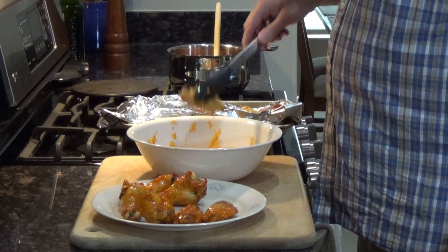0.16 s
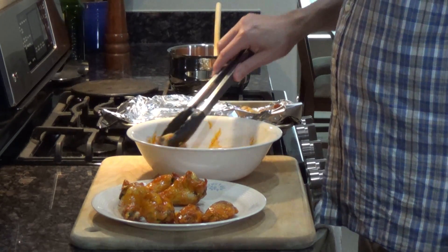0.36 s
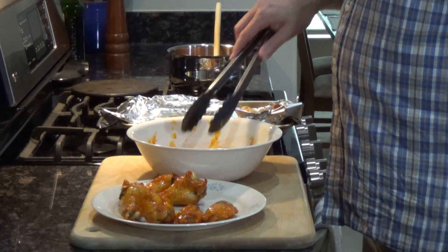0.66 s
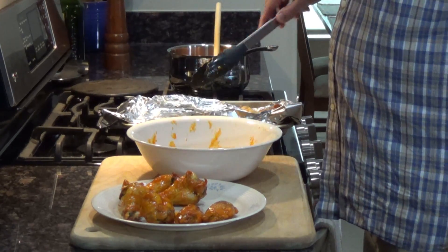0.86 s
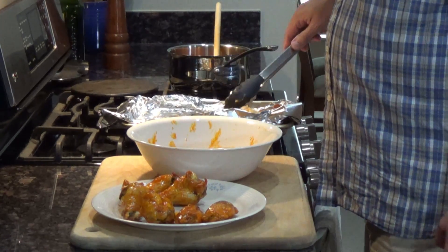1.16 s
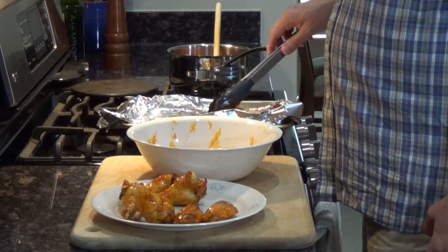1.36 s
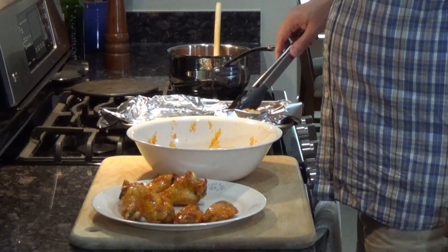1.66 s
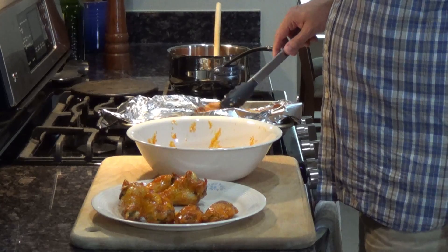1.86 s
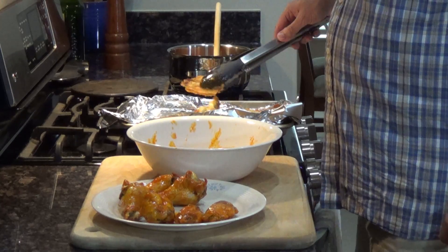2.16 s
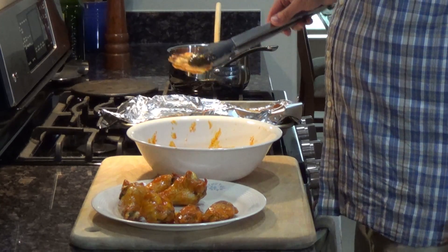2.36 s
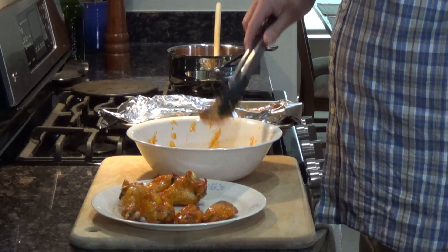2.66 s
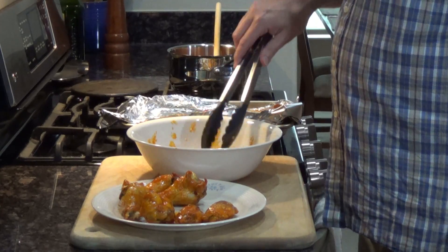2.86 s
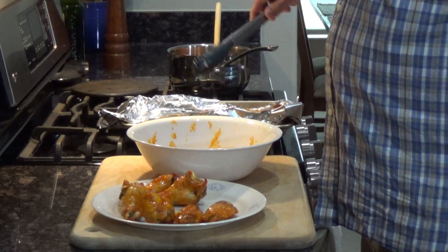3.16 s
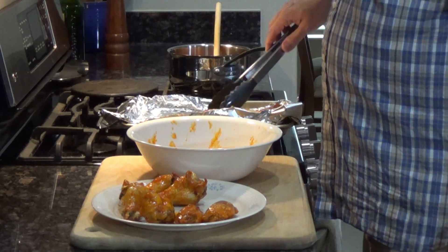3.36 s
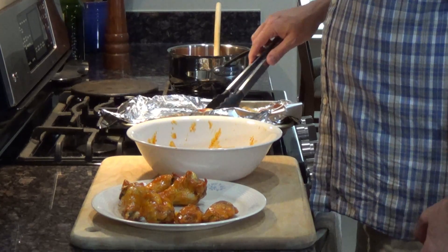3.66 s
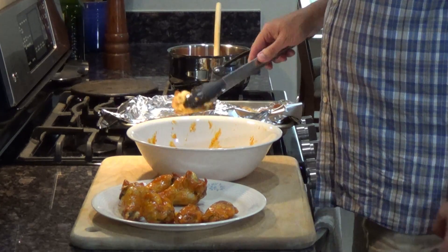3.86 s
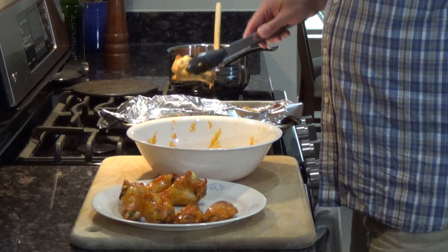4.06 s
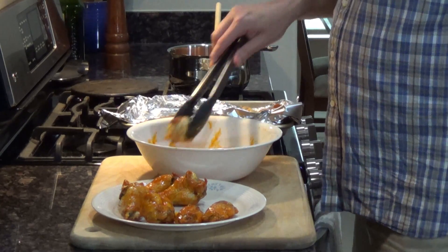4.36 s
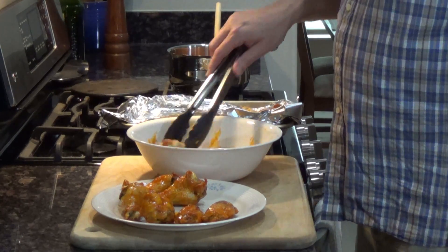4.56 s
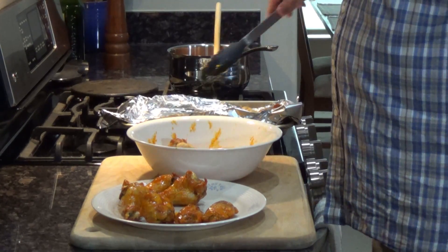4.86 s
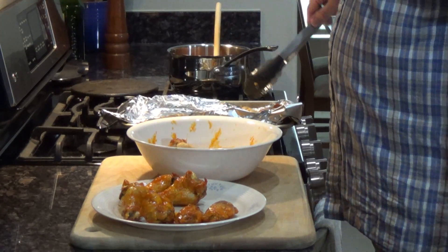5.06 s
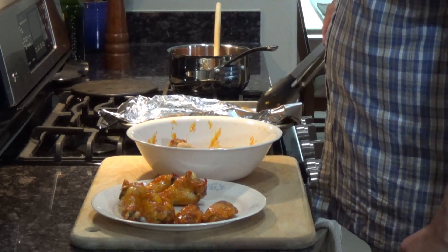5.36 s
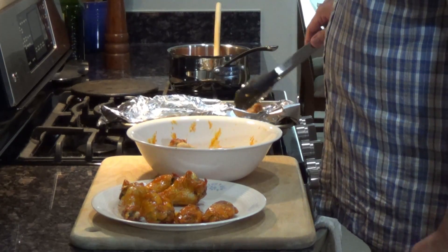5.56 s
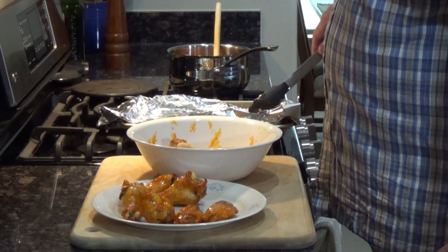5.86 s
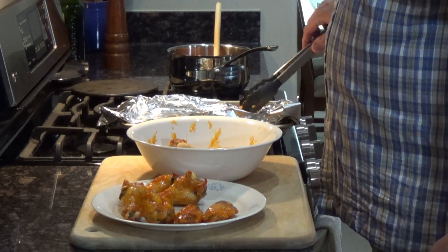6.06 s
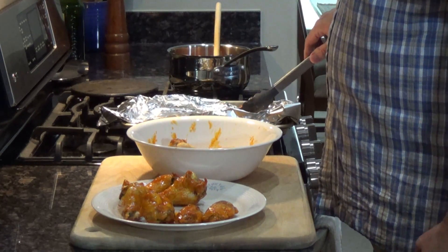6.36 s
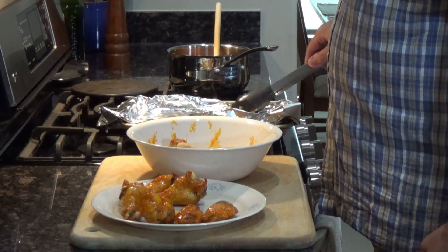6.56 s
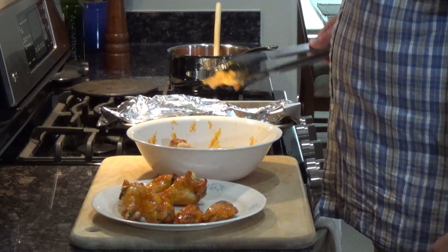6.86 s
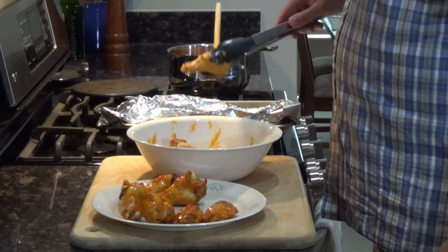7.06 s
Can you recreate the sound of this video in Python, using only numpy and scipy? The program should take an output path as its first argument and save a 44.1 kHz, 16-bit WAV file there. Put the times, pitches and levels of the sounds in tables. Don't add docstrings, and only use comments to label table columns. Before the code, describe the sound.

A small hard kitchen with short bright echoes, heard through a nearby stereo microphone with faint hiss, mains hum, rapid soft ticking and thin high whine. At about 0.55-0.7 seconds, steel tongs click in small dry chatters. From 1.2 to 2.2 they drag unevenly over a foil-lined tray, rustling with crisp snaps and dull pops. At 2.3 a hard press makes the loudest crack, with a low tray boom. Around 2.9 the tongs clatter and knock against a ceramic bowl. A light scrape begins at 3.4, with a boomy pop at 3.7 and brief rustle after. At 4.53 the bowl is struck clearly, ringing bright until soft taps and landing food muffle it by 4.8. From 5.4 foil crackles and drags again, peaking in a shove and sharp tray pops at 6.05-6.2, then a fading scrape with small snaps until 6.8, leaving quiet room hiss.

```python
import sys
import numpy as np
from scipy import signal
from scipy.fft import rfft, irfft
from scipy.io import wavfile
from scipy.ndimage import uniform_filter1d

SR = 44100
rng = np.random.default_rng(int(sys.argv[2]) if len(sys.argv) > 2 else 0)


def master_out(mix):
    frames = np.transpose(np.atleast_2d(mix))
    ceiling = np.clip(frames, -1, 1)
    pcm = np.round(ceiling * 32767).astype(np.int16)
    wavfile.write(sys.argv[1], SR, pcm)


def linear_from_db(decibels):
    return 10 ** (np.asarray(decibels, float) / 20)


N = 317513
T = np.arange(N) / SR

# pitch_hz, density_db (per Hz)
FOIL_COLOUR = [(1530, -27.5), (2600, -3.5), (2880, -3.5), (3120, 1), (4010, 0), (4390, 0.5), (7140, -9.5),
               (7500, -11), (9750, -23.5), (16500, -120)]
# pitch_hz, density_db (per Hz)
SIZZLE_COLOUR = [(3820, -49.5), (6500, -5.5), (7140, -7.5), (9190, 0), (10500, 0.5), (12900, -7),
                 (15300, -17), (16000, -15)]
# pitch_hz, density_db (per Hz)
FLEX_COLOUR = [(530, -32.5), (900, -1.5), (1450, -6.5), (1580, -3.5), (1730, -6), (2040, -1), (2800, -10.5),
               (3640, -28), (6160, -120)]


def set_rms(x, db):
    return x * linear_from_db(db) / np.sqrt(np.mean(x ** 2))


def colour(x, points):
    hz, db = np.transpose(points)
    f = np.maximum(np.fft.rfftfreq(4096, 1 / SR), 1)
    cepstrum = irfft(np.interp(np.log(f), np.log(hz), db) * np.log(10) / 20)
    cepstrum[1:2048] *= 2
    cepstrum[2049:] = 0
    response = irfft(np.exp(rfft(cepstrum)))
    return signal.fftconvolve(x, response / np.linalg.norm(response))[:N]


def ring(x, modes, damp=1.0, tilt_db=0., longest_s=1.0):
    out = np.zeros(len(x))
    for k, (hz, db, t60) in enumerate(modes):
        decay = np.log(1000) / (damp * min(t60, longest_s) * SR)
        pole = np.exp(2j * np.pi * hz / SR - decay)
        gain = (-1) ** k * linear_from_db(db + tilt_db * np.log2(hz / 9000))
        out += gain * signal.lfilter([1], [1, -pole], x).imag
    return out / sum(linear_from_db(m[1]) ** 2 for m in modes) ** .5


def walk(rate):
    hold = int(SR / rate)
    steps = np.repeat(rng.standard_normal(N // hold + 1), hold)
    return 1.67 * uniform_filter1d(uniform_filter1d(steps, hold), hold)[:N]


def bursts(events, rise_ms):
    env = np.zeros((4, N))
    t_ms = T[:SR // 4] * 1000
    for s, db, *re_db, ms in events:
        shape = (1 - np.exp(-(t_ms + 0.052) / rise_ms)) * np.exp(-t_ms / max(ms, .1))
        start = int(s * SR)
        env[:, start:start + len(t_ms)] += linear_from_db(db + np.array([0] + re_db))[:, None] * shape
    return env


def crackle(rate, spread_db):
    fires = rng.random(N) < rate / SR
    sizes = linear_from_db(spread_db * np.minimum(rng.exponential(size=N), 5))
    return set_rms(fires * rng.choice([-1, 1], N) * sizes, 0)


def camcorder():
    # pitch_hz, density_db (per Hz)
    air_mid = [(12, -86), (20, -51.5), (48, -14), (91, -16.5), (172, -6), (210, -11), (301, -6.5),
               (328, -10.5), (357, -1.5), (388, -7.5), (698, -8.5), (2200, -18), (3160, -18.5),
               (12400, -23.5), (16000, -24)]
    air_side = [(12, -95), (20, -61), (127, -16), (270, -9), (301, -4), (337, -1), (1090, -1.5), (1260, -2),
                (3250, -6.5), (8410, -19), (16000, -64)]
    # pitch_hz, level_db (rms)
    hum = [(60, -81.5), (120, -78.5), (179, -76.5), (241, -72.5), (301, -68), (361, -71), (420, -74),
           (481, -70), (700, -74.5)]
    frame_hz, first_tick_s, whine_hz = 30 / 1.001, .0295, 15734.
    mid = set_rms(colour(rng.standard_normal(N), air_mid), -57.5) * linear_from_db(.5 * walk(3.04))
    side = set_rms(colour(rng.standard_normal(N), air_side), -63.5)
    for hz, db in hum + [(whine_hz, -70)]:
        wavering = 2 ** .5 * linear_from_db(db + 1.44 * walk(8.9))
        mid += wavering * np.sin(2 * np.pi * hz * T + 0.41 * walk(2.7))
    at = np.arange(first_tick_s, T[-1], 1 / frame_hz)
    ticks = np.zeros(N)
    ticks[(at * SR).astype(int)] = linear_from_db(1.5 * (-1) ** np.arange(len(at)) + 1.2 * rng.standard_normal(len(at)))
    mid += linear_from_db(-56.5) * ring(ticks, [(3210, 5.5, 0.032), (3640, -6.5, 0.028)])
    return mid * linear_from_db(np.array([[-.15], [.15]])) + side * np.array([[1], [-1]])


def bowl():
    # start_s, peak_db, hardness_db (per octave), ring left by the grip (0-1)
    strikes = [
        (2.9105, -46, -2.5, 0.23),
        (4.5322, -23.5, 2, 0.58),
        (4.692, -44.5, 13, 0.2),
        (4.7661, -49, 1, 0.46),
    ]
    # pitch_hz, level_db, t60_s
    partials = [(720, 0, 1.86), (1335, -21, 2.4), (2132, -15.5, 1.3), (3043, -1.5, 0.2),
                (4032, -16.5, 0.26), (5120, -5.5, 0.1), (5830, -25.5, .25), (6100, -16, 0.32),
                (6280, -5.5, 0.28), (6720, -2.5, 0.19), (7160, -5, .2), (7440, -8, 0.2), (7870, -2.5, 0.27),
                (8200, -5, 0.07), (8800, 0, 0.19), (8950, -2, 0.16), (9000, -22, .17), (9600, 0, 0.2),
                (10200, -8.5, 0.28), (10600, -22, .18), (10600, 3, 0.049), (11470, -25.5, 0.098),
                (11630, -30, .22), (12700, -11, .12), (12900, -32, .2)]
    food_lands_s, muffled_t60_s = 4.77, .12
    low_hz, _, low_t60 = partials[0]
    low, high = np.zeros((2, N))
    blow = signal.unit_impulse(SR // 2)
    twins = [(hz * (1 + 0.002 * (hz > 4500)), db + 2.5, 0.55 * t60) for hz, db, t60 in partials[1:]]
    t = T[:SR]
    for s, db, hard_db, grip in strikes:
        i = int(s * SR)
        low[i:i + SR] += linear_from_db(db - 21 - 4.6 * hard_db - 60 * t / low_t60) * np.sin(2 * np.pi * low_hz * t)
        bright = ring(blow, partials[1:] + twins, damp=grip ** 2 * 4, tilt_db=hard_db)
        high[i:i + SR // 2] += linear_from_db(db) * bright
    return low + high * linear_from_db(-60 * np.clip(T - food_lands_s, 0, 1) / muffled_t60_s)


def tongs():
    # start_s, peak_db, top_db (re peak), chatter_ms, pitch_hz
    clicks = [(0.5443, -34, -12, 3.3, 4430), (0.5827, -34.5, -9, 4.8, 3740), (.598, -46, -1, 12, 2500),
              (.6755, -31.5, -0.5, 5, 3100), (.681, -28.5, -9, 7.7, 6300), (0.693, -31.5, -7, 6, 7800),
              (.707, -48, -1, 6, 6000), (2.858, -45, -5, 8, 4100), (2.866, -36, -10, 4.4, 2800),
              (2.8881, -26.5, -7, 5.2, 4510), (2.894, -27, -6, 3.2, 5000), (2.906, -40, 9, 1.4, 4830),
              (2.9112, -27, -6.5, 5, 5630), (2.927, -39, -11, 15, 5500), (4.5306, -24, 5, 8, 5240),
              (4.6925, -48.5, 17, 9.9, 6000), (4.7665, -47.5, 5.5, 18, 3117)]
    # start_s, peak_db, pitch_hz, t60_s
    knocks = [(.676, -50, 1760, .04), (2.858, -49, 1270, 0.061), (2.888, -25, 1230, 0.019),
              (2.888, -27.5, 1740, 0.012), (2.888, -41.5, 8200, .025), (2.911, -33, 504, 0.056),
              (2.911, -27.5, 905, 0.019), (2.911, -27.5, 1300, 0.021), (2.925, -52, 6100, .2),
              (2.911, -46, 8200, .025), (2.918, -36, 1760, 0.022), (2.918, -36, 602, 0.095),
              (2.92, -49, 258, 0.24), (2.93, -55, 111, 0.14), (4.532, -45.5, 267, 0.36),
              (4.532, -29.5, 513, 0.026), (4.797, -42.5, 276, 0.052)]
    out, t = np.zeros(N), T[:SR // 4]
    contact = 1 - np.exp(-(t + .0001) / 0.00075)
    for s, db, top_db, ms, hz in clicks:
        chatter = rng.standard_normal(len(t)) * np.exp(-1000 * t / max(ms, .1)) * contact
        chatter[SR // 3000] = 4.5
        body = colour(chatter, FLEX_COLOUR[:-3] + FOIL_COLOUR[2:])[:len(t)]
        crack = 0.33 * ring(chatter, [(hz, 0, .0025)]) + linear_from_db(-8) * body
        top = linear_from_db(top_db) * colour(chatter, SIZZLE_COLOUR)[:len(t)]
        out[int(s * SR):][:len(t)] += linear_from_db(db - 8.5) * (crack + top)
    for s, db, hz, t60 in knocks:
        swing = 1 - np.exp(-t * hz * 2)
        out[int(s * SR):][:len(t)] += linear_from_db(db - 60 * t / t60) * swing * np.sin(2 * np.pi * hz * t)
    return out


def foil():
    # time_s, effort_db, tray_weight_db
    drags = [
        [(1.22, -79, 3), (1.292, -44.5, -9.5), (1.4, -45, 0), (1.48, -52, -4), (1.68, -44, -3), (1.73, -49, 3),
         (1.806, -38.5, -9.5), (1.92, -48, -9)],
        [(1.92, -41.5, -12.5), (2.07, -53, -6), (2.08, -38, -16), (2.2, -54, 1)],
        [(3.4, -87, 3), (3.456, -50.5, -20), (3.484, -51, -2), (3.604, -64, 3), (3.682, -43, -17)],
        [(3.69, -25.5, -6.5), (3.738, -50.5, 7), (3.818, -40, -17), (3.95, -80, 19)],
        [(5.36, -87, -3), (5.392, -46.5, -1.5), (5.62, -33, -9), (5.682, -42, 0), (5.812, -51.5, -4),
         (5.87, -46.5, -2.5), (5.995, -63, 8)],
        [(5.985, -56, 5), (6.03, -49.5, -8), (6.06, -28.5, -18), (6.156, -45.5, 4), (6.164, -30, -6),
         (6.19, -39.5, 5.5), (6.36, -62.5, 7.5)],
        [(6.35, -63, 6), (6.525, -58.5, 0.5), (6.538, -52.5, -1), (6.59, -49, -0.5), (6.8, -74.5, 11)],
    ]
    # start_s, peak_db, crispness_db
    creases_snapping = [(1.2655, -44, -7), (1.3287, -37, -6), (1.383, -38, 4), (1.45, -28.5, -17.5),
                        (1.617, -22.5, -4), (1.665, -31.5, 4.5), (1.5074, -45, 5), (1.8275, -35, -18),
                        (1.9318, -22.5, -3), (1.963, -29.5, -1.5), (1.9774, -30, -3), (2.035, -23.5, 0),
                        (2.079, -20, -2), (3.4434, -40, -12.5), (3.526, -41, -3), (5.389, -26.5, -4),
                        (5.446, -41, -19), (5.559, -28, 1), (5.6056, -25.5, 4.5), (5.6436, -23, -12),
                        (5.675, -36.5, -24.5), (5.751, -33, 0.5), (5.812, -35, -3), (5.869, -33.5, -25),
                        (6.045, -36, 5.5), (6.095, -23, 5.5), (6.536, -41, -14), (6.573, -33.5, -6),
                        (6.6244, -42, -14), (6.703, -51, -17)]
    # start_s, peak_db, sizzle_db, boom_db (both re peak), burst_ms
    jolts = [
        (1.5564, -27.5, -7, -11.5, 10.5),
        (1.715, -40, -6, 8, 13),
        (1.792, -29.5, -10, -2.5, 12),
        (2.3131, -9, 5, 8, 11.8),
        (2.3203, -4, -3.5, -21, 7.3),
        (3.6594, -35.5, -8, -8, 20),
        (3.695, -19.5, -21, -2, 11.7),
        (3.7424, -36.5, 7, -10, 16),
        (6.1623, -16, -24, -9.5, 12),
        (6.189, -24.5, 7, 2, 10.6),
    ]
    # rest_db, slope (dB per dB of weight)
    drag_mix = [(-5.5, -0.21), (3.5, 1.17), (-2.5, 0.3)]
    # rest_db, slope (dB per dB of crispness)
    snap_mix = [(1.1, 1.1), (-19, -0.8), (-14.5, -1)]
    # pitch_hz, level_db, t60_s
    tray_modes = [(239.7, -22.5, 0.37), (484, -19, .45), (575.2, 1.5, 0.29), (690, -2.5, 0.25),
                  (788, -17, 0.31), (961.4, -13.5, 0.41), (1162, -16, 0.25), (1303, -20, .2)]
    # pitch_hz, density_db (per Hz)
    boom_colour = [(120, -38), (200, -17.5), (237, -21.5), (271, -22), (352, -15), (438, -11.5), (588, 5),
                   (733, -1.5), (951, -0.5), (1500, -13), (1950, -34.5), (3300, -120)]

    snaps = []
    for s, db, crisp in creases_snapping:
        layers = [rest + slope * crisp for rest, slope in snap_mix]
        snaps.append((s, db, *layers, 10.8 - 0.47 * (db + 30.5)))
    pop_bursts = [(s, db, top, low, -1 + .3 * low, ms) for s, db, top, low, ms in jolts]
    env = linear_from_db(-10.0) * bursts(snaps, rise_ms=2.85) + linear_from_db(-11.5) * bursts(pop_bursts, rise_ms=1.56)

    uneven = 1.56 * walk(60) + 2.13 * np.array([walk(35) for layer in range(4)])
    for drag in drags:
        s, db, weight = np.transpose(drag)
        on = slice(int(s[0] * SR), int(s[-1] * SR))
        fade = np.clip(np.minimum(T[on] - s[0], s[-1] - T[on]) / 0.0097, 0, 1)
        layers = [db] + [db + rest + slope * weight for rest, slope in drag_mix]
        curves = np.array([np.interp(T[on], s, c) for c in layers])
        env[:, on] += fade * linear_from_db(-5.0 + curves + uneven[:, on])

    creases, pops = crackle(6000, spread_db=2.5), np.zeros(N)
    for s, db, top, low, ms in jolts:
        creases[int((s + .0015) * SR)] = linear_from_db(14.5)
        pops[int(s * SR)] = linear_from_db(db + low - 13.5)
    small = 0.67 * creases + 1.09 * crackle(10000, spread_db=-1.0)
    hiss = colour(env[0] * creases, FOIL_COLOUR)
    hiss += colour(env[1] * small, SIZZLE_COLOUR)
    hiss += colour(env[3] * creases, FLEX_COLOUR)
    boom = ring(pops + linear_from_db(-35) * env[2] * creases, tray_modes, damp=0.91)
    boom += linear_from_db(-1.5) * colour(env[2] * creases, boom_colour)
    return hiss, boom


def room(x, ringing, wet_db, side_db):
    # pitch_hz, t60_s
    room_decay = [(150, 0.74), (600, 0.67), (2000, 0.49), (6000, 0.42), (14000, 0.21)]
    t, tails = T[:SR * 2 // 3], 0
    hz, t60 = np.transpose(room_decay)
    for f in 250 * 2. ** np.arange(7):
        edges = [f / 2 ** .5, min(f * 2 ** .5, 20000)]
        band = signal.butter(2, edges, "bandpass", fs=SR, output="sos")
        decay = linear_from_db(-60 * t / np.interp(np.log(f), np.log(hz), t60))
        tails += signal.sosfilt(band, rng.standard_normal((4, len(t)))) * decay
    tails *= 1 - np.exp(-(t / 0.00079) ** 2)
    tails /= np.linalg.norm(tails, axis=1, keepdims=True)
    place = 2 * np.pi * 170 * T + 2 * walk(30)
    spots = x * np.array([np.cos(place), np.sin(place)]) + ringing / 2 ** .5
    echo = signal.oaconvolve(np.tile(spots, (2, 1)), tails, axes=1)[:, :N]
    side = colour(echo[2] + echo[3], [(100, -7), (300, -4), (700, 6.5), (2000, 7.0), (5000, 6.5),
                                      (9000, 1.0), (14000, -7.0)])
    return linear_from_db(wet_db) * (echo[0] + echo[1]) + linear_from_db(side_db) * side * np.array([[1], [-1]])


def scene():
    no_bass = signal.butter(4, 190, "high", fs=SR, output="sos")
    hiss, boom = signal.sosfilt(no_bass, foil())
    steel, dish = tongs(), bowl()
    pan = np.array([[.5], [-.5]])
    direct = hiss * linear_from_db(1.0 * pan) + boom * linear_from_db(-3. * pan)
    direct = direct + steel * linear_from_db(-.4 * pan) + dish * linear_from_db(0.39 * pan)
    echo = room(hiss + steel, 0.7 * boom + 0.52 * dish, wet_db=-5.0, side_db=-17.5)
    return direct + echo + camcorder()


def band_limit(x):
    return signal.sosfilt(signal.butter(12, 17000, fs=SR, output="sos"), x)


def record(dry):
    edge = signal.ellip(8, .2, 50, 15950, fs=SR, output="sos")
    mix = np.clip(signal.sosfilt(edge, dry), -1, 1)
    return band_limit(mix)


dry = scene()
out = record(dry)
master_out(out)
```